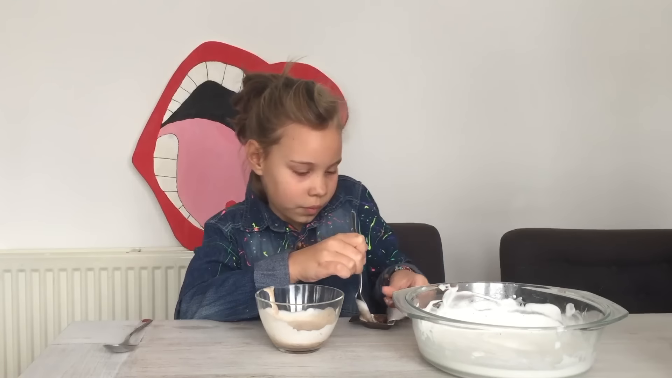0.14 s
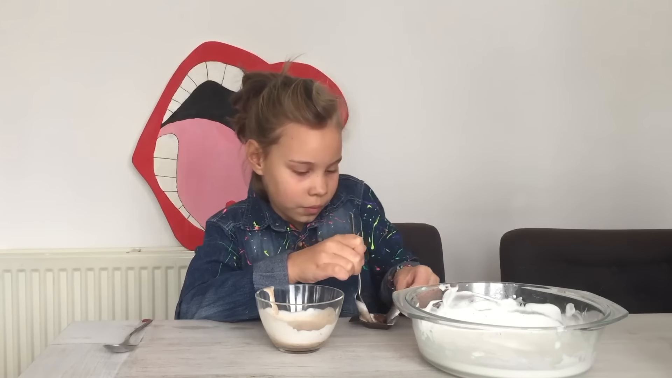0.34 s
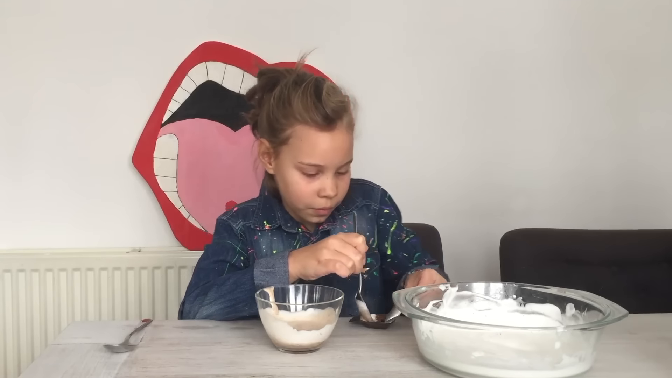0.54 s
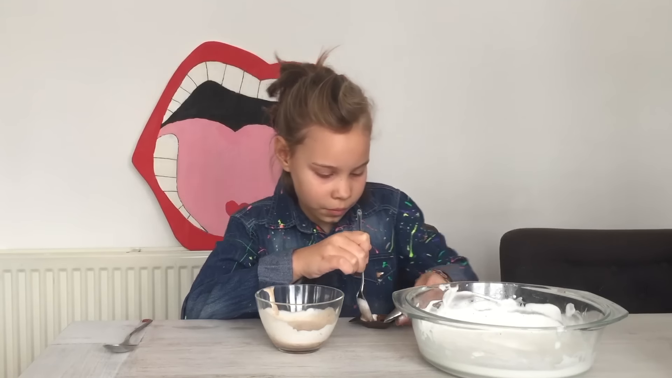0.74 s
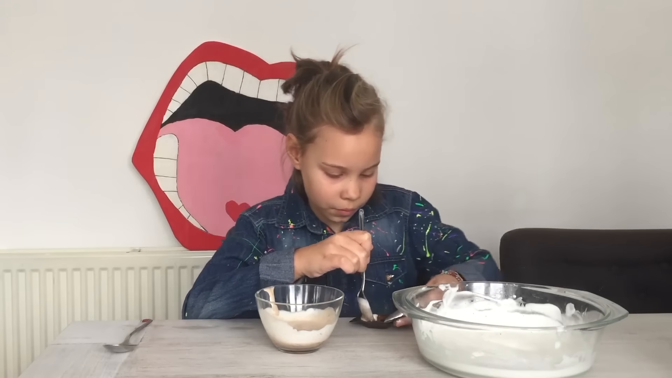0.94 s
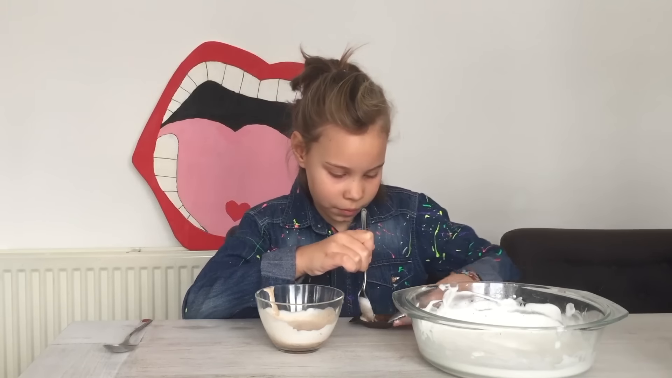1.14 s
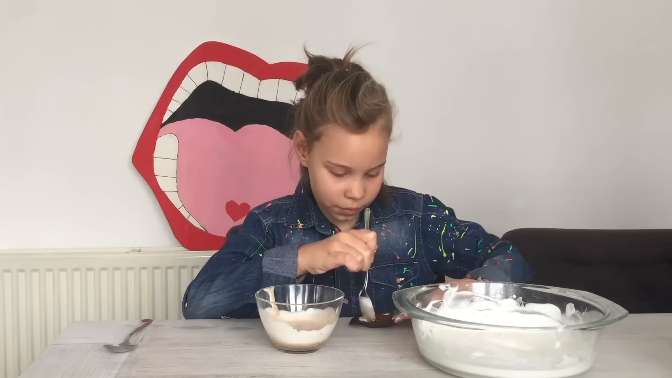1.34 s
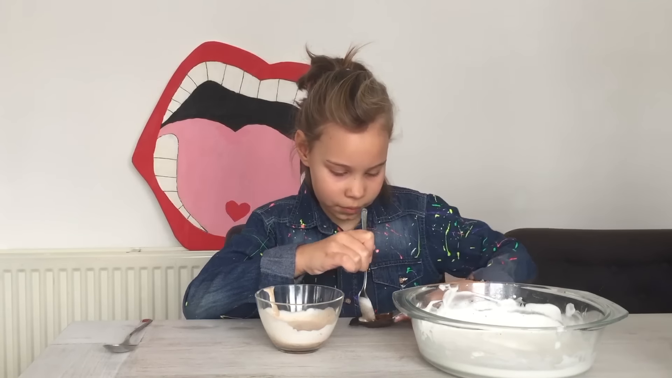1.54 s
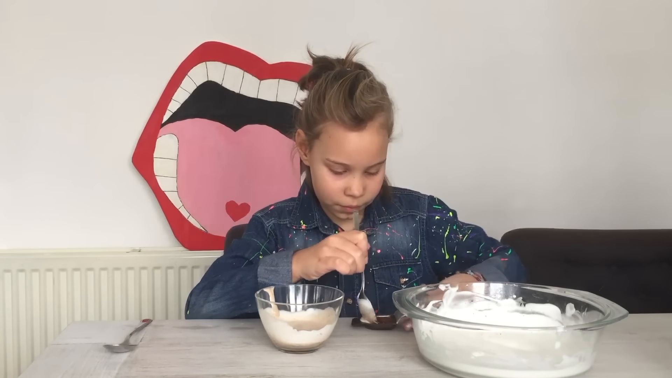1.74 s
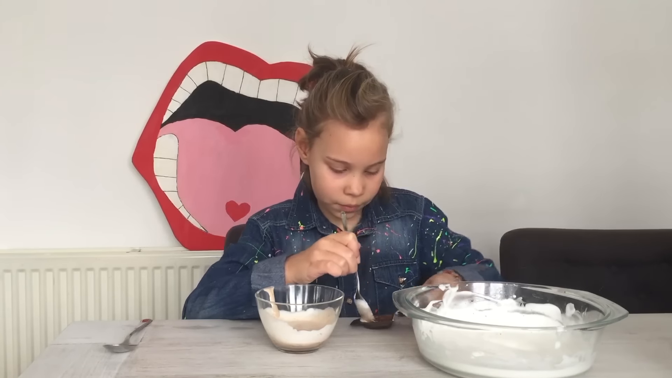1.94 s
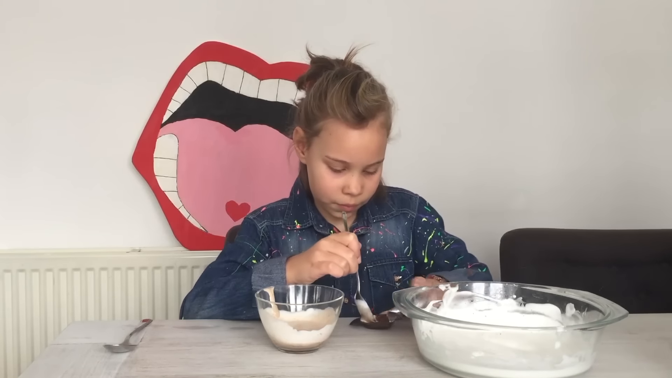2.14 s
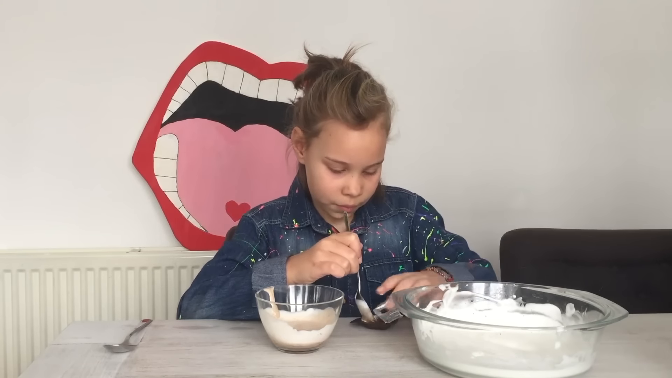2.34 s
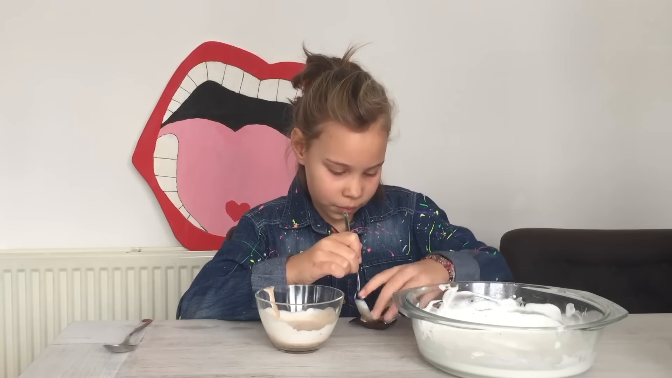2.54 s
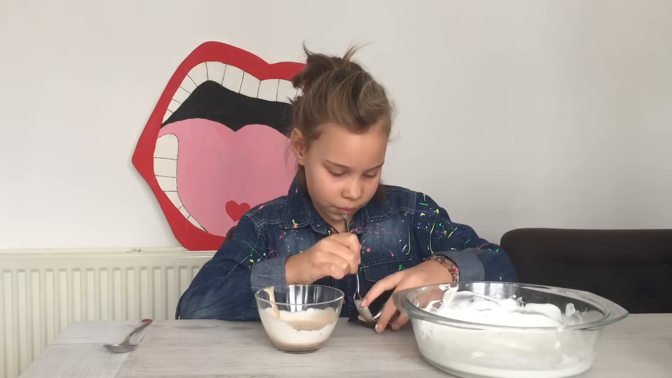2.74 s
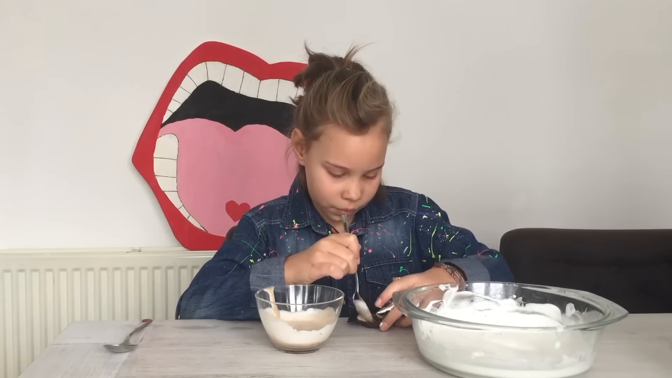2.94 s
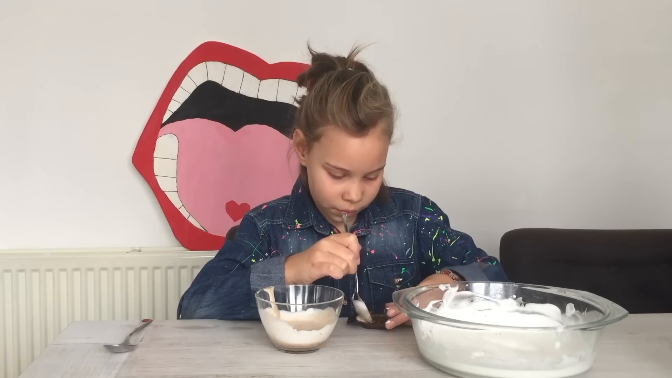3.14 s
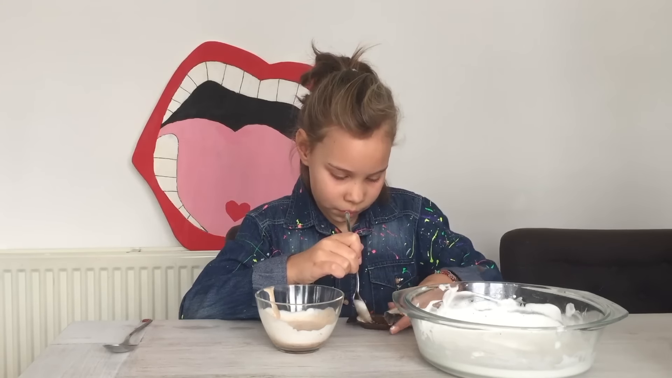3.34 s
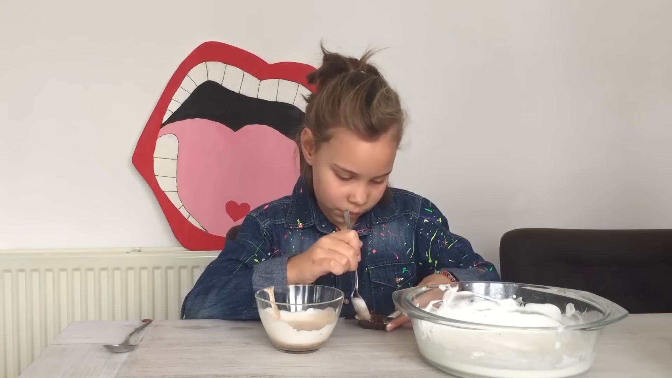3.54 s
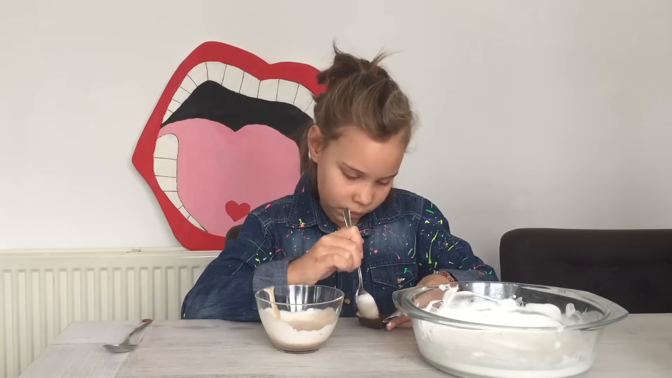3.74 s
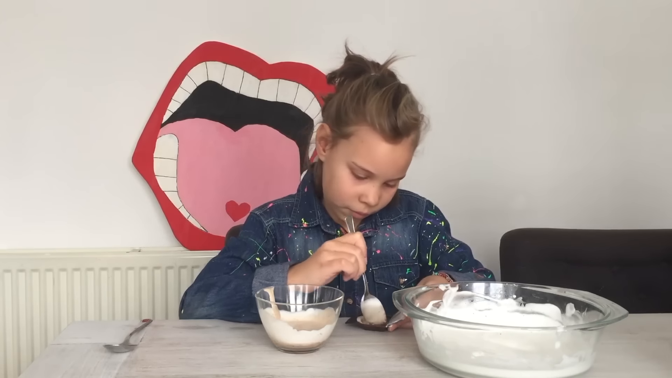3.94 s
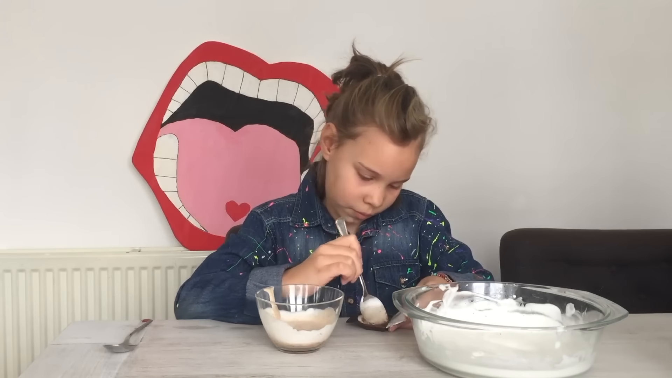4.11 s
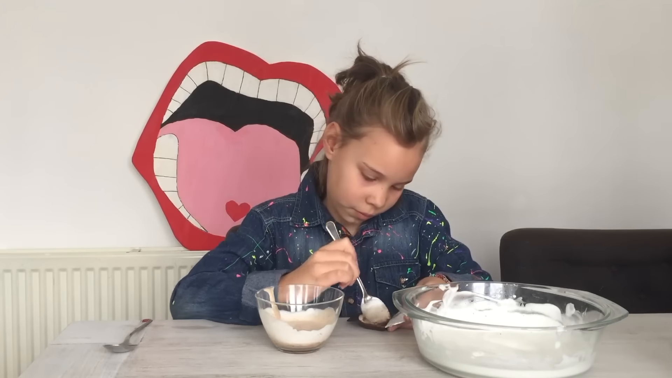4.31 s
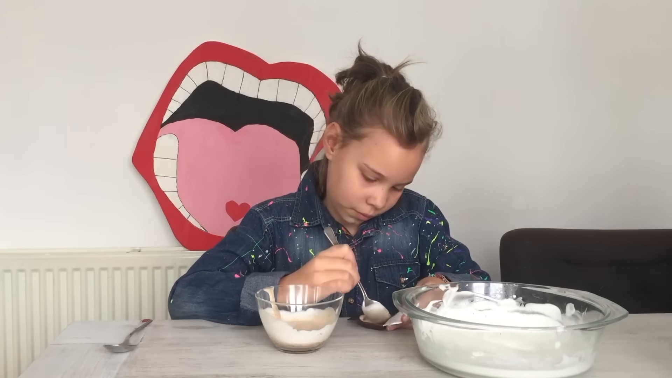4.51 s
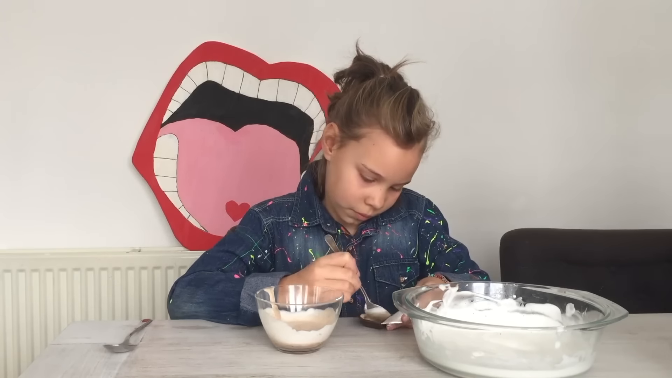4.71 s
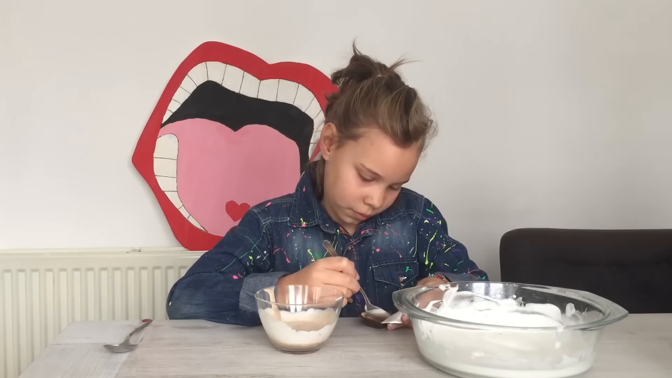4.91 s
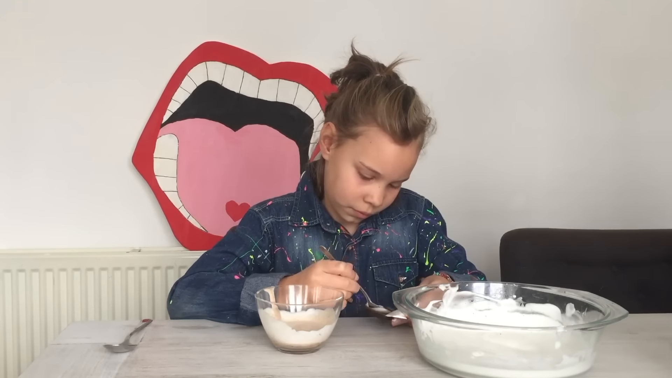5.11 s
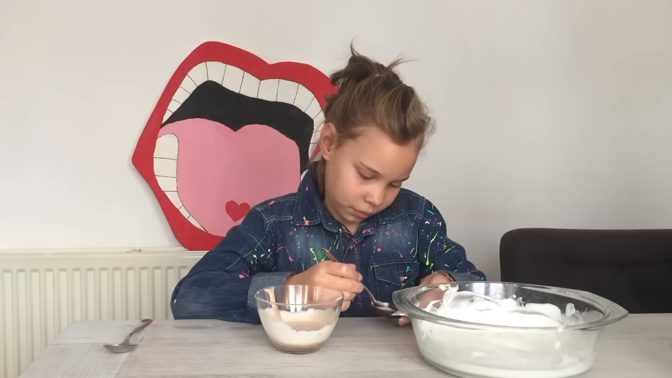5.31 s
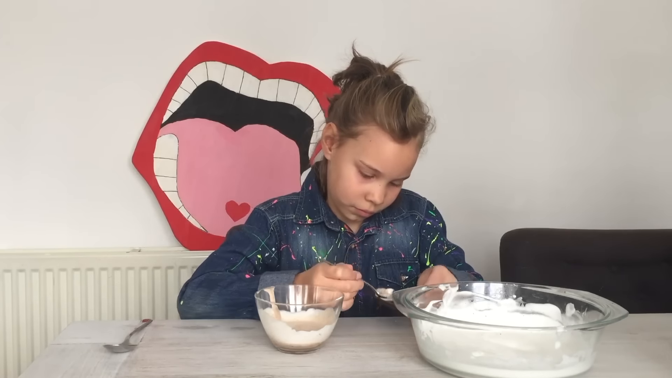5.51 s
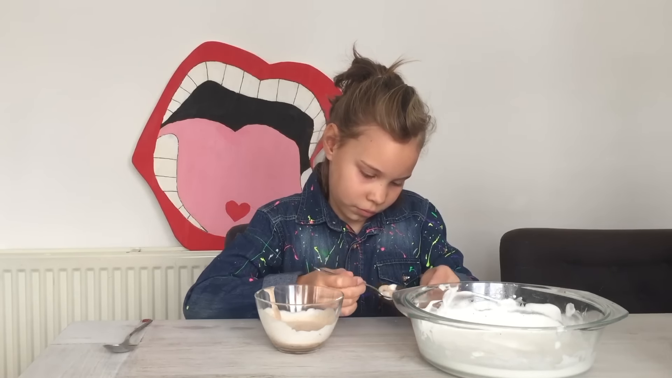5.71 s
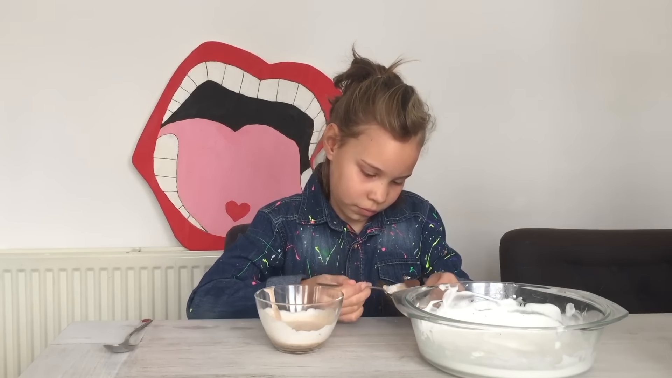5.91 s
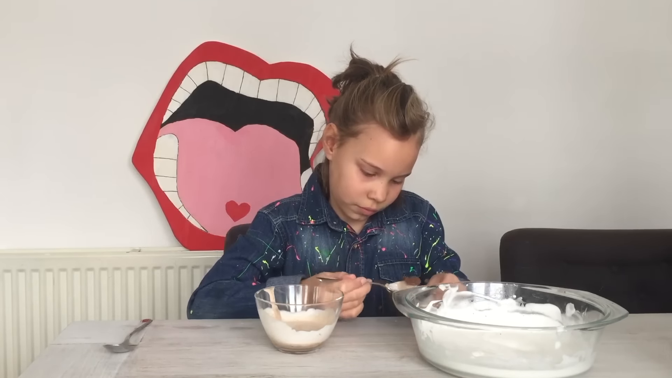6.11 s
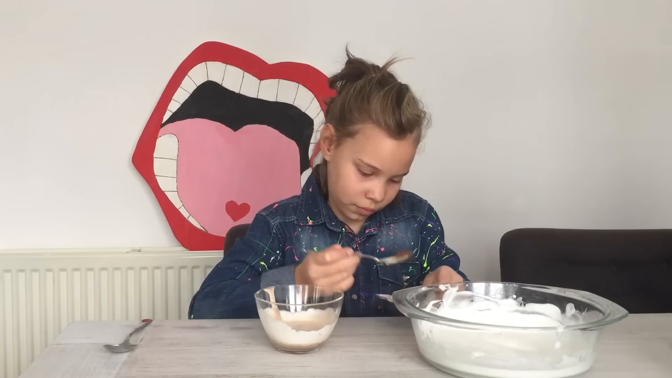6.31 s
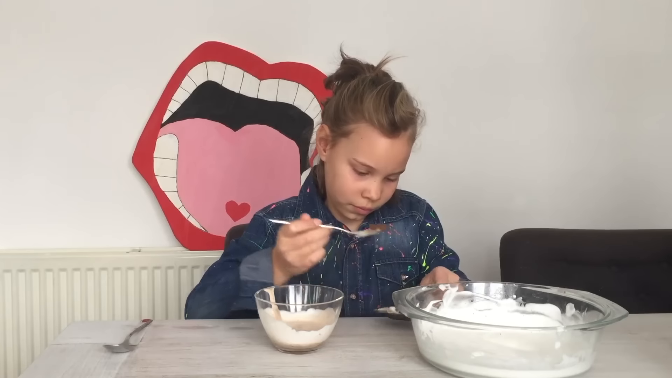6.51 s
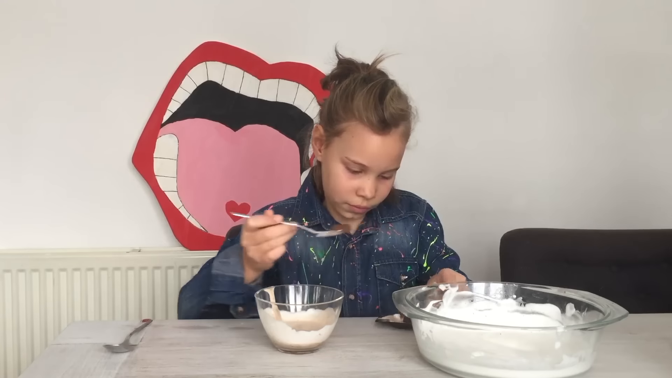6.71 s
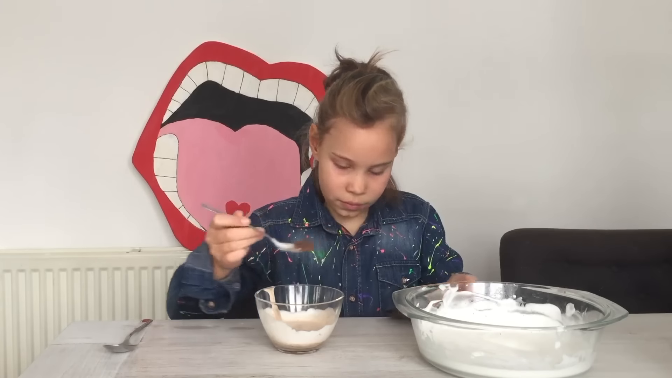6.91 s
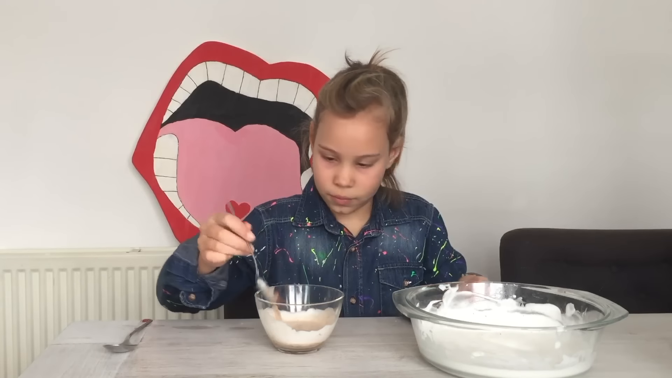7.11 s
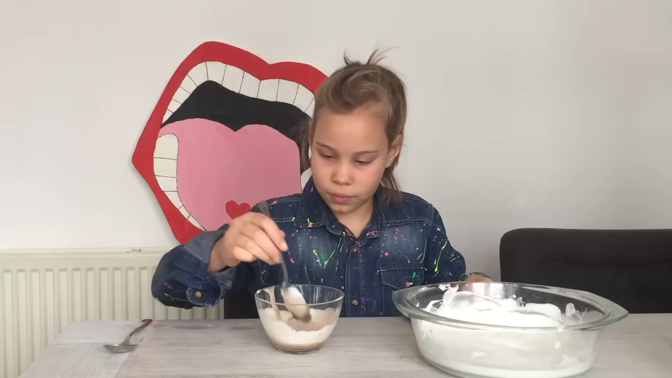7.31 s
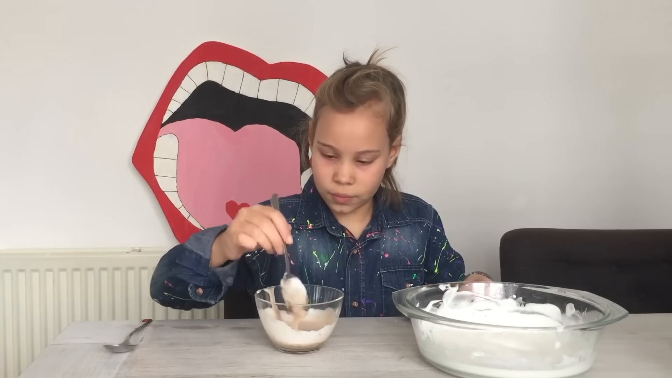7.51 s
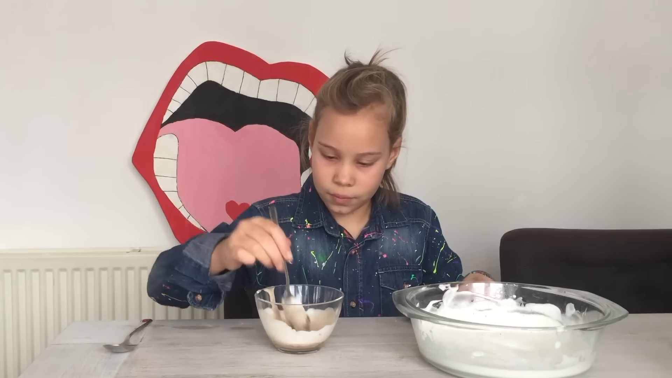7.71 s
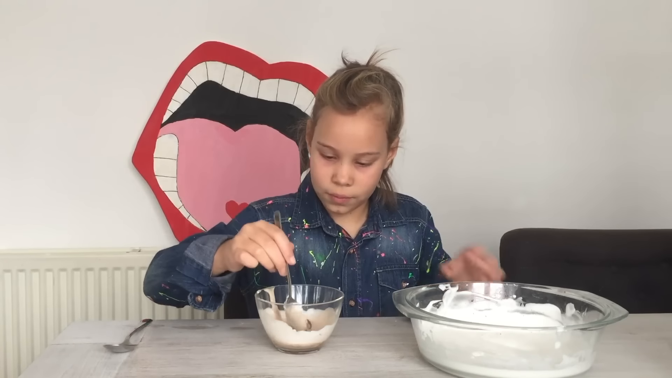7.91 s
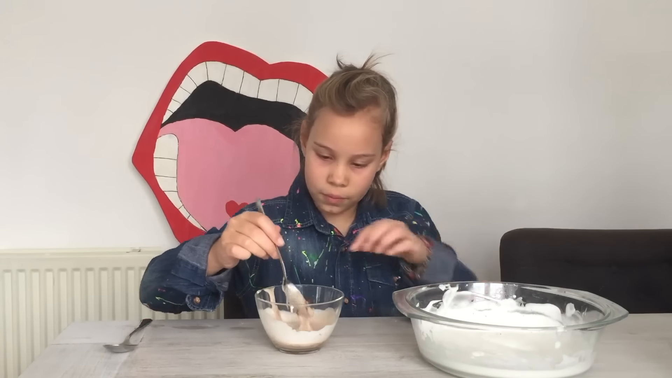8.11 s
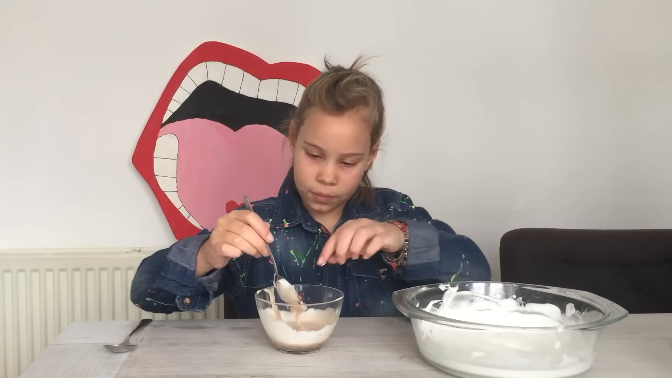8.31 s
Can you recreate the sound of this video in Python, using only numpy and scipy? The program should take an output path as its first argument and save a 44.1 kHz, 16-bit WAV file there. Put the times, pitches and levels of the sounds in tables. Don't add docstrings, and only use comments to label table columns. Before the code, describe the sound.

In a quiet dining room with low hum and soft hiss, a spoon scrapes sticky paste from a thin plastic cup, its walls snapping and crackling irregularly. A glass dish rings faintly early on. The crackle thins out, then a small glass bowl clinks clearly and is knocked hard twice on the wooden table. The microphone is a few metres away, with short room reflections.

```python
import sys
import numpy as np
from scipy import signal
from scipy.fft import rfft, irfft
from scipy.io import wavfile
from scipy.ndimage import uniform_filter1d

SR = 44100
rng = np.random.default_rng(int(sys.argv[2]) if len(sys.argv) > 2 else 0)


def boost_factor(decibels):
    exponent = np.asarray(decibels, float) / 20
    return 10 ** exponent


def wrap_up_sound(samples):
    columns = np.atleast_2d(samples).T
    tamed = np.clip(columns, -1, 1)
    steps = np.round(tamed * 32767).astype(np.int16)
    wavfile.write(sys.argv[1], SR, steps)


N = 368227

# frequency in Hz, level in dB per Hz.
HISS_SPECTRUM = [(15, -40.5), (25, -2.5), (154, -5.5), (245, -10), (445, -18), (1010, -21), (1250, -18.5),
                 (1600, -18.5), (2150, -24), (2980, -25), (10400, -33), (14000, -28), (15200, -37),
                 (16500, -64.5)]
# multiple of the mains frequency, level in dB.
HUM_HARMONICS = [(1, -65.5), (2, -63.5), (3, -58.5), (6, -81), (7, -76), (8, -77.5), (9, -74.5), (10, -78),
                 (12, -76), (13, -89.5)]

# hardest moment in seconds, pressure in dB, press in seconds,
# drag in seconds, brightness in dB.
STROKES = [(.164, -44, 0.031, 0.033, 12), (.46, -40, 0.26, 0.021, -13), (.934, -51, 0.09, 0.32, -7),
           (1.296, -30, 0.11, 0.036, 4), (1.496, -39, 0.17, 0.056, 2), (1.722, -42, 0.03, 0.49, -16),
           (2.072, -31.5, 0.053, 0.056, -1), (2.456, -36, 0.078, 0.029, 2), (2.66, -51, 0.0044, 0.18, -13),
           (3.104, -35, 0.013, 0.17, 0), (3.5, -38.5, 0.018, 0.065, 1), (3.574, -30, .025, 0.057, -6),
           (6.008, -43.5, 0.061, 0.033, -11), (6.358, -44, 0.057, 0.1, -13)]
# frequency in Hz, level in dB per Hz.
CUP_SPECTRUM = [(240, -59.5), (800, -5), (1870, 1.5), (2150, 1), (3320, -7.5), (4980, -6), (5730, -6),
                (7580, -12), (11700, -9.5), (15700, -10), (16500, -30.5)]

# start in seconds,
# crack peak in dB, ringing panel in Hz, fizz in dB.
FURTHER_SNAPS = [(.1495, -37.5, 3030, -13), (.458, -40.5, 2130, 14.5), (.5824, -40, 4700, 0),
                 (.7133, -43, 4000, -10), (.9387, -31, 1790, -1), (1.7301, -31, 2600, -12),
                 (1.8673, -43, 1770, -14), (2.1298, -33, 1750, -18), (2.576, -41, 2960, -22),
                 (3.347, -49.5, 3740, 14), (3.3885, -48, 6800, 8), (3.595, -29, 3570, -16),
                 (3.6262, -31.5, 2500, -3), (2.878, -41, 2370, -20), (3.778, -36, 2380, 1),
                 (3.8784, -45, 2400, -19), (4.9013, -38, 2470, 0), (5.239, -59, 6160, 21),
                 (5.3977, -40, 7350, 13), (5.632, -49, 6250, 15), (6.325, -43, 3700, -2),
                 (6.4925, -44, 6500, 3.5), (2.3071, -36, 2870, -7.5), (6.9442, -55, 5850, 16),
                 (7.3607, -48, 4240, -11), (7.3834, -32, 3180, -9), (7.4172, -38, 4300, 4.5),
                 (7.457, -39.5, 3120, -12), (7.516, -41, 4220, 3), (7.7895, -34.5, 3700, 4.5)]
# start in seconds, crack peak in dB, ringing panel in Hz, fizz in dB.
RIB_SNAPS = [(.1579, -22.5, 6300, -2), (.377, -29.5, 4970, -2), (.452, -27, 4650, -23),
             (.9568, -29.5, 4100, 6.5), (1.0196, -31, 4630, 3), (1.0357, -36, 5400, 5),
             (1.0624, -26, 5640, 2), (1.0854, -27.5, 4600, 6.5), (1.194, -29.5, 6740, 5),
             (1.2162, -18.5, 5980, 5.5), (1.2577, -23, 6750, 5), (1.32, -33, 7100, 20),
             (1.4469, -24, 5060, -1), (1.4767, -39, 5100, 12), (1.549, -24, 5160, -3),
             (1.7396, -28, 5600, 7.5), (1.7957, -23, 5600, -4), (2.3938, -31.5, 6650, -6),
             (2.7671, -31, 4700, 1.5), (3.1643, -22.5, 5960, -4), (3.186, -39, 6500, 8),
             (3.2491, -23, 6200, -2), (3.3159, -30.5, 3804, -9), (3.7873, -32.5, 7040, 13.5),
             (4.331, -28.5, 6560, 2), (.4034, -32, 7110, 8), (4.6607, -36.5, 4240, 6.5),
             (5.3869, -33.5, 8430, 12.5), (6.3469, -35, 4300, -4), (6.3866, -36, 6100, 4)]
# start in seconds, crack peak in dB, ringing panel in Hz, fizz in dB.
PANEL_CRACKS = [(.1764, -33, 2320, -17), (.931, -28.5, 3300, -3), (1.0005, -28, 1330, 0.5),
                (1.717, -27.5, 2550, -20), (1.778, -27.5, 2940, -4), (1.8825, -29, 1810, -1),
                (1.9149, -26.5, 2670, -3), (2.032, -34.5, 2130, -8), (2.0525, -33, 3240, 0),
                (2.4359, -20.5, 2970, -7), (2.48, -20, 3020, 1.5), (2.6692, -22, 2930, -7.5),
                (3.2682, -31.5, 1780, 4.5), (3.5066, -22.5, 3680, -9), (3.5687, -25, 3200, 3.5),
                (3.5834, -21, 2580, -9), (3.6422, -22.5, 2770, -3.5), (3.6685, -25, 3440, -18),
                (3.8331, -27.5, 2390, 1), (3.9698, -35.5, 3020, -11), (4.1599, -31.5, 2900, 7.5),
                (4.2389, -29.5, 2520, 0.5), (4.4142, -30, 3010, 0.5), (4.7119, -10, 2990, -10.5),
                (4.8115, -25.5, 3040, -1), (4.9137, -23, 2450, -3), (5.059, -29, 3060, 4.5),
                (5.9993, -25, 3200, 1), (6.3513, -27, 3130, -10), (6.41, -27, 2300, -1)]
# start in seconds, crack peak in dB, ringing panel in Hz, fizz in dB.
WALL_BUCKLES = [(.2724, -36.5, 2800, 3), (.3212, -38, 2730, -16), (.3888, -24.5, 5580, 4.5),
                (4.5979, -17.5, 3720, 4.5), (.4434, -43, 2730, -4), (1.1072, -29, 3880, 12),
                (1.2221, -31, 5600, -8), (1.2504, -26, 2740, -5), (1.2746, -23.5, 1270, 10),
                (1.3019, -22.5, 6500, 7), (1.4128, -25, 2650, 1.5), (1.4894, -21, 1430, -15),
                (1.751, -27.5, 1770, -4), (1.9367, -25.5, 2860, 3.5), (2.0674, -24, 2960, -4),
                (2.1762, -30, 1830, 6), (2.4469, -21, 1300, -1), (2.458, -24.5, 1830, -2),
                (2.6652, -21, 1524, -23), (2.795, -28, 2400, -10), (2.896, -40.5, 1510, -20),
                (3.1056, -21.5, 2960, -5), (3.2056, -27.5, 1780, -7), (3.2222, -33, 1910, -13),
                (3.4989, -24, 2650, 3.5), (3.5771, -28.5, 1400, -12), (4.069, -35.5, 2110, -30),
                (4.366, -32.5, 3070, -7), (5.311, -34, 2570, -22), (6.7135, -23.5, 3500, -9)]
# start in seconds,
# peak in dB, frequency in Hz.
LOW_BOOMS = [(.389, -46, 717), (1.15, -51, 695), (1.224, -46, 690), (1.275, -44, 685), (1.447, -50.5, 736),
             (2.068, -39.5, 704), (2.447, -41, 625), (2.667, -50.5, 620), (2.878, -56, 700),
             (3.2, -54, 830), (3.499, -44.5, 700), (3.577, -50, 620), (4.366, -49, 970),
             (4.596, -39.5, 1375), (6.0, -45.5, 1500), (7.714, -19, 695), (7.862, -13.5, 620),
             (2.8, -44.5, 1050), (4.069, -47.5, 1300), (7.864, -21, 380), (1.0, -46, 1240),
             (6.712, -36.5, 590)]

# start in seconds, peak in dB, brightness in dB, rattle length in seconds.
KNOCKS = [
    (2.312, -34.5, -6, 0.0056),
    (6.7, -36, -7, 0.019),
    (6.712, -43.5, -14, 0.0017),
    (7.103, -43, -11, 0.012),
    (7.241, -24, -3, 0.007),
    (7.712, -11.5, 0.5, 0.0035),
    (7.8587, -1, 5, 0.0026),
]
# frequency in Hz, bandwidth in Hz, level in dB.
TABLE_MODES = [(218, 50, -14.5), (262, 45, 5), (340, 240, 7.5), (496, 180, -7), (620, 94, 2),
               (724, 39, 9.5), (895, 150, -0.5), (1256, 215, 9), (1516, 83, -1.5), (1940, 460, -3.5),
               (2550, 950, -9.5), (3680, 120, -4.5), (3814, 190, -3), (5060, 47, -16.5), (5750, 600, -28),
               (6500, 460, -13.5), (7660, 260, -45), (9100, 720, -19.5), (10200, 1400, -27),
               (11850, 360, -37.5), (15100, 1000, -32.5)]

# start in seconds, peak in dB.
DISH_TOUCH = [(2.313, -34.5)]
# frequency in Hz, level in dB, 60 dB decay time in seconds.
DISH_PARTIALS = [(554, -2, .16), (1437, 0, .4), (2358, -7, .22), (3537, -11, .14)]
# start in seconds, peak in dB.
BOWL_CLINK = [(7.241, -13.5)]
# frequency in Hz, level in dB, 60 dB decay time in seconds.
BOWL_PARTIALS = [(1270, 0, .43), (2482, -12, .18), (2530, -22, .1), (4011, -26, .15), (4226, -11, .36),
                 (4268, -11, .1), (5986, -27, .1), (6438, -15, .17), (6500, -19, .1), (9092, -26, .07),
                 (12100, -28, .14)]

# delay in seconds, level in dB.
EARLY_ECHOES = [(.0066, -14), (.0108, -17), (.0162, -16), (.021, -16)]
# frequency in Hz, 60 dB decay time in seconds.
ROOM_DECAY = [(100, 0.6), (300, 0.3), (1000, 0.4), (3000, 0.34), (7000, 0.3), (15000, 0.18)]
# frequency in Hz, gain in dB.
MIC_RESPONSE = [(25, -14.5), (50, -0.5), (4300, 2.5), (4800, -1.5), (5400, 3), (9600, -1.5), (10500, -6),
                (11500, -2), (15000, -7), (15800, -1), (16100, -22.5), (17000, -31.5)]

HISS_DB, MAINS_HZ, MIC_EDGE_HZ = -58, 50.1, 17000
PRESS_DB, SAG_DB, LIFT_DB, LIFT_S = 24, 16.5, 16, 0.087
BUCKLE_THUD_DB, CRACK_THUD_DB, RIB_THUD_DB, FURTHER_THUD_DB = -0.5, -32, -21, -0.5
SMALL_PANEL_HZ = 3800
WIDER, NARROWER, NEIGHBOUR_SPREAD = 0.628, 1.419, 0.13
RING_S, LOW_RINGS_LONGER = 0.00058, 0.53
BOOM_S, WALL_HZ = 0.0018, 1050
CLINK_FIZZ_DB = -24
SHIFT_PER_S = 1.3


def evened(x):
    return x / np.sqrt(np.mean(x ** 2, axis=-1, keepdims=True) + 1e-20)


def peaked(x, db):
    return boost_factor(db) * x / np.abs(x).max()


def read(points, hz):
    f, value = np.transpose(points)
    return np.interp(np.log(hz + 1), np.log(f + 1), value)


def add(mix, s, sound):
    part = mix[round(s * SR):][:len(sound)]
    part += sound[:len(part)]


def band(x, lo_hz, hi_hz):
    return signal.sosfilt(signal.butter(2, [lo_hz, hi_hz], "band", fs=SR, output="sos"), x)


def coloured(x, gain):
    hz = np.fft.rfftfreq(x.shape[-1], 1 / SR)
    return irfft(rfft(x) * gain(hz), x.shape[-1])


def burst(noise, decay):
    t = np.arange(len(noise)) / SR
    envelope = t * np.exp(-t / decay)
    for _ in range(3):
        z = rfft(noise * envelope)
        noise = irfft(z / np.abs(z + 1e-12) ** .5) / (envelope + 1e-5)
        noise = np.clip(noise / np.median(np.abs(noise[:60])), -4, 4)
    return noise * envelope


def floor():
    t = np.arange(N) / SR
    noise = coloured(rng.standard_normal(N), lambda hz: boost_factor(read(HISS_SPECTRUM, hz)))
    hiss = boost_factor(HISS_DB - 1.5) * evened(noise)
    wavers = evened(uniform_filter1d(rng.standard_normal((len(HUM_HARMONICS), N)), size=9000))
    hum = np.zeros(N)
    for (k, db), waver in zip(HUM_HARMONICS, wavers):
        hum += boost_factor(db + 1.0 + 1.73 * waver) * np.sin(2 * np.pi * k * MAINS_HZ * t + 0.59 * waver)
    return hiss + hum


def scrape():
    t = np.arange(N) / SR
    size = boost_factor(3.3 * np.minimum(rng.exponential(1, N), 4))
    happens = rng.random(N) < 900 / SR
    slips = size * happens * rng.standard_normal(N)
    hz, _, z = signal.stft(slips, SR, nperseg=256)
    panels = uniform_filter1d(rng.standard_normal(z.shape), size=4, axis=0)
    panels = uniform_filter1d(panels, size=9, axis=1)
    panels *= 4.5 / panels.std()
    cup_db = panels + read(CUP_SPECTRUM, hz)[:, None]
    dull = evened(signal.istft(z * boost_factor(cup_db), SR, nperseg=256)[1][:N])
    bright = band(dull, 8400, 22000)
    out = np.zeros(N)
    for s, db, press, drag, bright_db in STROKES:
        times = [s - press, s, s + drag, s + drag + LIFT_S]
        drops = [PRESS_DB, 0, SAG_DB, SAG_DB + LIFT_DB]
        level = db - np.interp(t, times, drops, left=150, right=150)
        out += boost_factor(level - 7) * (dull + (boost_factor(bright_db) - 1) * bright)
    return band(out, 1120, 20000)


def panel(hz):
    t = np.arange(512) / SR
    return np.sin(2 * np.pi * hz * t) * t * np.exp(-t / RING_S * (hz / 3000) ** LOW_RINGS_LONGER)


def snaps():
    out = np.zeros(N)
    kinds = [(FURTHER_SNAPS, FURTHER_THUD_DB), (RIB_SNAPS, RIB_THUD_DB),
             (PANEL_CRACKS, CRACK_THUD_DB), (WALL_BUCKLES, BUCKLE_THUD_DB)]
    rows = [(*row, thud_db) for table, thud_db in kinds for row in table]
    noise = rng.standard_normal((len(rows), 3, 512))
    for (s, db, hz, fizz_db, thud_db), (grit, sand, luck) in zip(rows, noise):
        ratio = WIDER if hz > SMALL_PANEL_HZ else NARROWER
        second_hz = hz * ratio * np.exp(NEIGHBOUR_SPREAD * luck[0])
        crack = burst(grit, decay=0.00059)
        hiss = burst(sand, decay=0.00045)
        body = peaked(panel(hz), -6.0) + peaked(panel(second_hz), -9.5)
        body += peaked(band(crack, 1990, 5800), -5.5)
        thud = peaked(band(band(crack, 490, 2330), 1236, 2750), thud_db - 6)
        fizz = peaked(band(hiss, 7030, 17100), fizz_db)
        add(out, s - .0008, boost_factor(db) * (body + thud + fizz))
    return band(out, WALL_HZ, 20000)


def booms():
    out, t = np.zeros(N), np.arange(1024) / SR
    for s, db, hz in LOW_BOOMS:
        cycles = np.sin(2 * np.pi * hz * t) * t * np.exp(-t / BOOM_S)
        add(out, s, peaked(cycles, db))
    return out


def knocks():
    out, t = np.zeros(N), np.arange(4096) / SR
    noise = rng.standard_normal((len(KNOCKS), 4096))
    for (s, db, bright_db, rattle_s), rough in zip(KNOCKS, noise):
        blow = peaked(burst(rough, decay=0.000474), 0) + 0.091 * rough * np.exp(-t / rattle_s)
        blow = blow + .45 * np.roll(blow, 405)
        body = np.zeros(4096)
        for hz, width, top_db in TABLE_MODES:
            mode = np.exp(-np.pi * width * t) * np.sin(2 * np.pi * hz * t)
            body += boost_factor(top_db + bright_db * np.log2(hz / 1000) / 2) * width * mode
        knock = signal.fftconvolve(blow, body)[:4096]
        knock = band(band(knock, 170, 19500), 170, 19500)
        add(out, s - .0005, peaked(knock, db))
    return out


def ring(partials):
    t = np.arange(SR // 2) / SR
    return sum(boost_factor(db - 60 * t / t60) * np.sin(2 * np.pi * hz * t) for hz, db, t60 in partials)


def glass():
    rings, tick = np.zeros(N), np.zeros(N)
    touch_s, touch_db = DISH_TOUCH[0]
    clink_s, clink_db = BOWL_CLINK[0]
    add(rings, touch_s, peaked(ring(DISH_PARTIALS), touch_db - 1))
    add(rings, clink_s, peaked(ring(BOWL_PARTIALS), clink_db - 1))
    contact = burst(rng.standard_normal(512), decay=0.00037)
    fizz = burst(rng.standard_normal(512), decay=0.0008)
    add(tick, clink_s, peaked(band(contact, 1400, 7500), -17.5))
    add(tick, clink_s, peaked(band(fizz, 12200, 16000), CLINK_FIZZ_DB))
    return rings, tick


def room(x):
    taps = np.zeros(SR // 2)
    at = np.arange(240, SR // 2 - 20, 12)
    taps[at + rng.integers(0, 12, len(at))] = rng.choice([-1., 1.], len(at))
    early_lift = 1 + 0.54 * np.exp(-np.arange(SR // 2) / SR / .03)
    hz, t, z = signal.stft(taps * early_lift, SR, nperseg=256)
    decay = boost_factor(-60 * t / read(ROOM_DECAY, hz)[:, None])
    tail = signal.istft(z * decay, SR, nperseg=256)[1]
    tail *= boost_factor(-2.0) / np.linalg.norm(tail)
    near = np.arange(24, 230, 9)
    tail[near] += rng.choice([-1., 1.], len(near)) * boost_factor(-11 - 3300 * near / SR)
    for s, db in EARLY_ECHOES:
        tail[round(s * SR)] += boost_factor(db)
    return signal.fftconvolve(x, tail)[:N]


def scene():
    background = floor()
    cup = scrape() + snaps() + booms()
    table = knocks()
    rings, tick = glass()
    struck = cup + tick + boost_factor(3.0) * table + boost_factor(-10.5) * rings
    turn = 2 * np.pi * SHIFT_PER_S * np.arange(N) / SR
    wet = np.zeros(N)
    for k in range(3):
        wet += room(struck * np.sqrt(2 / 3) * np.cos(turn + k * np.pi / 3))
    return (cup + table + rings + tick + wet + background)[None]


def roll_off(x):
    return signal.sosfilt(signal.butter(12, 16980, fs=SR, output="sos"), x)


def record(dry):
    power_db = 10 * np.log10(abs(uniform_filter1d(dry[0] ** 2, size=400)) + 1e-12)
    fall = np.arange(N) * 30 / SR
    held_db = np.maximum.accumulate(power_db + fall) - fall
    over_db = np.maximum(held_db + 20, 0)
    late = signal.lfilter([.002], [1, -.998], over_db)
    ducked = dry / boost_factor(.25 * late)
    heard = coloured(ducked, lambda hz: boost_factor(read(MIC_RESPONSE, hz)) * (hz < MIC_EDGE_HZ))
    return roll_off(heard)


dry = scene()
out = record(dry)
wrap_up_sound(out)
```